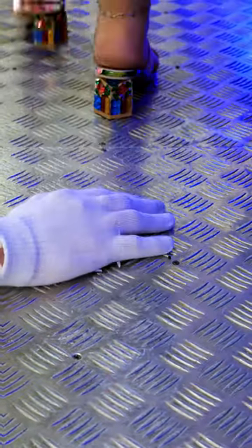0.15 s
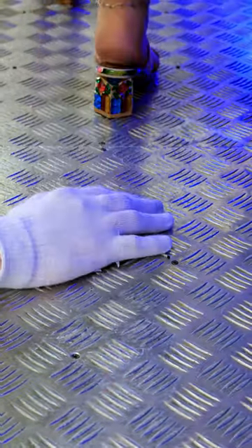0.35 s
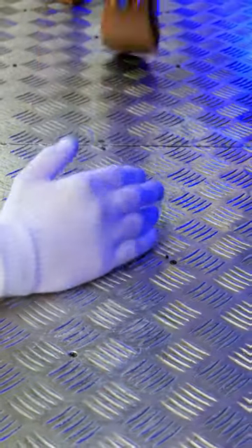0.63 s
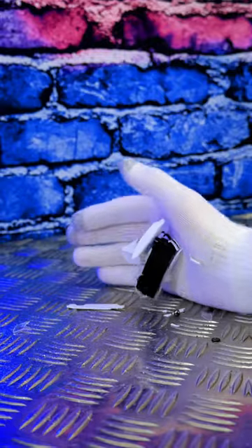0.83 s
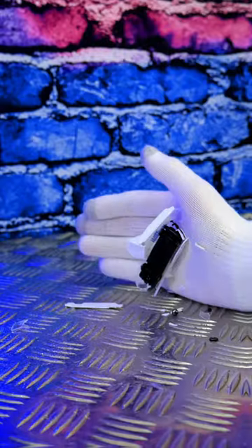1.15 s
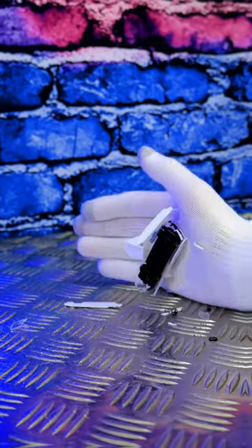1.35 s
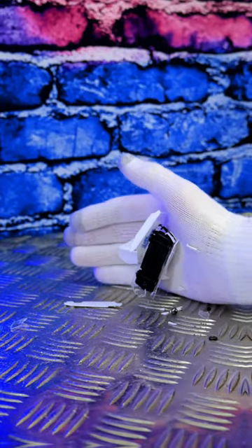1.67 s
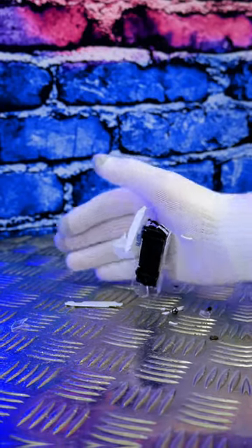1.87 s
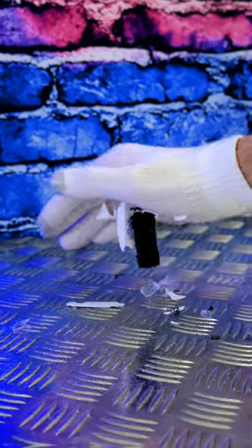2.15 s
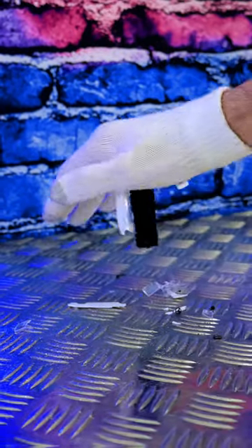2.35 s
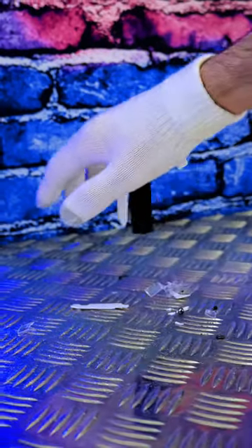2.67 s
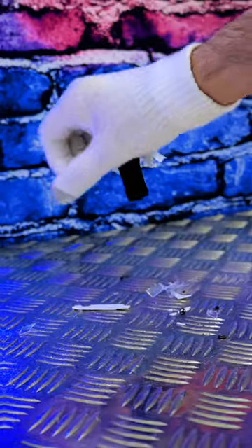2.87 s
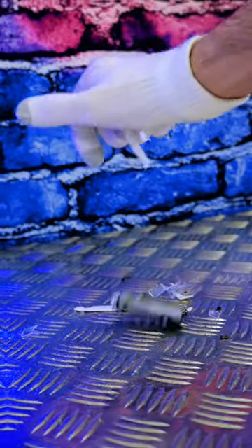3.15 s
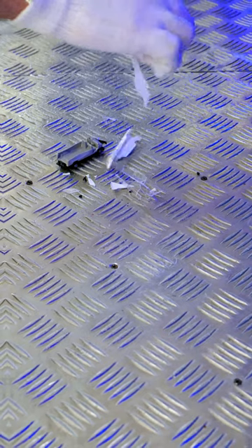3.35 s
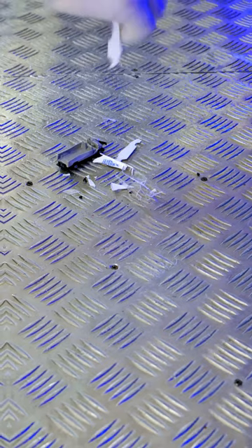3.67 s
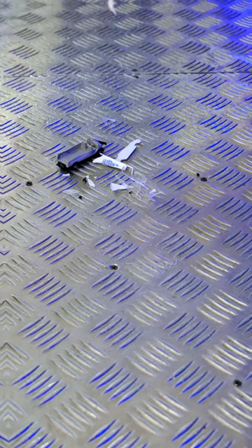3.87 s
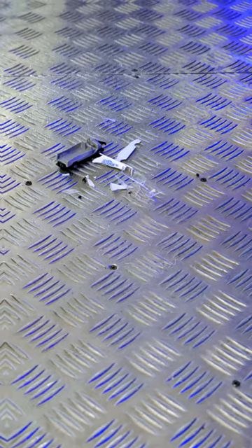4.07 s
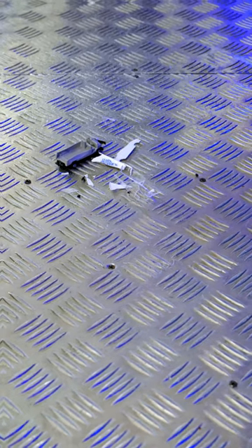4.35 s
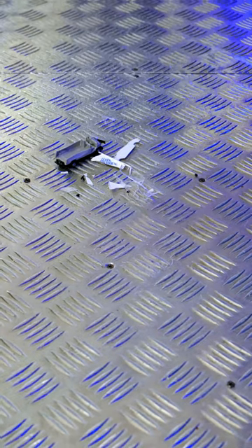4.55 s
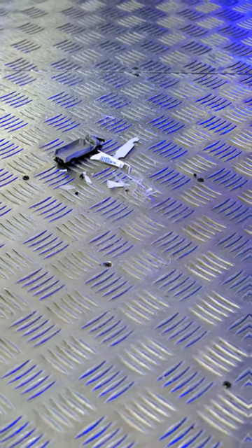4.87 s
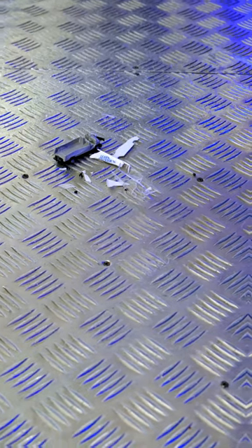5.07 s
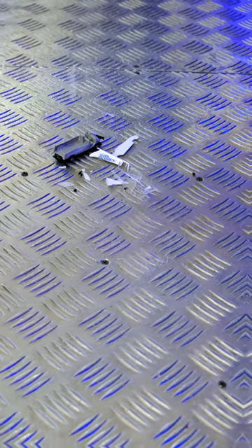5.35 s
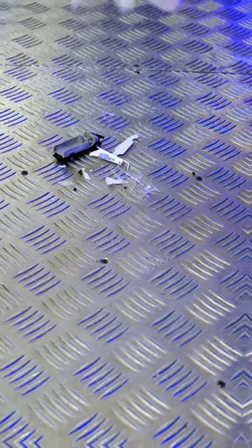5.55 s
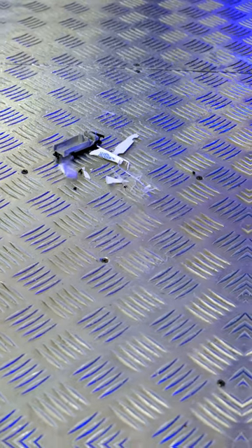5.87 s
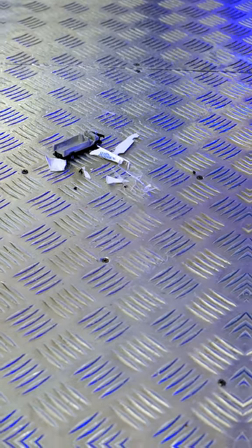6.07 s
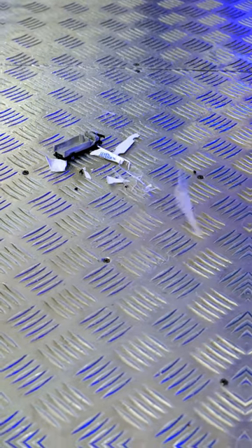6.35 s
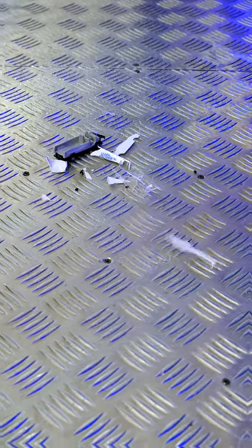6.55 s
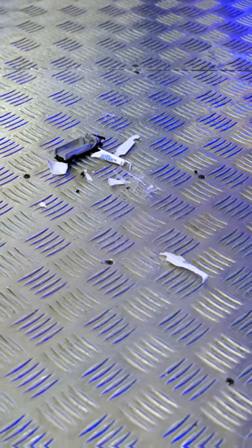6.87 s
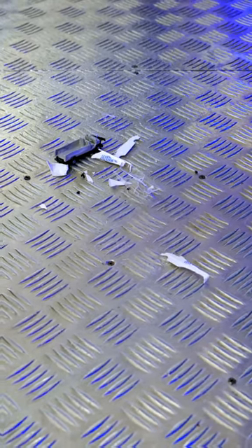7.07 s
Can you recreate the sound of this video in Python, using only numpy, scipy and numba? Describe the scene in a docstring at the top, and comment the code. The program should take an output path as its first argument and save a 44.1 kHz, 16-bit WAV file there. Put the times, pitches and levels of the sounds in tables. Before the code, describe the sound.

A gloved hand lifts broken plastic from a metal tread plate. An early cluster of dull knocks and crackling snaps gives way to small ticks and one soft heavy thump. Pieces then drop: a loud clack, crisp snaps, a bright bouncing rattle, a duller shell clatter and tiny chip clicks. Close stereo microphones, nearer on the left, with short room reflections and near-silent gaps.

```python
"""A crushed plastic toy is lifted off a metal tread plate by a gloved hand: its pieces snap, drop and bounce.
Snaps are short rattles of shaped noise; falling pieces add damped resonances, and knocks and pings decaying sines.
Glove and sleeve are two uneven noises, the plate's rumble is low noise, the arm's air pressure a slow sine.
A small hard room adds decaying noise tails to each contact, over coloured room tone that slowly swells and sinks.
Two microphones, the left one nearer to most sounds, each pass through their own noise gate."""
import sys
import numpy as np
from scipy import signal
from scipy.fft import rfft, irfft, next_fast_len
from scipy.io import wavfile
from scipy.ndimage import uniform_filter1d, map_coordinates
from numba import njit

SR = 44100
rng = np.random.default_rng(int(sys.argv[2]) if len(sys.argv) > 2 else 0)


def unload_wav(signal):
    """Save mono or channel-first audio to the path in sys.argv[1] as 16-bit WAV at rate SR, clipped to [-1, 1]."""
    wavfile.write(
        sys.argv[1],
        SR,
        np.round(np.clip(np.atleast_2d(signal).T, -1, 1) * 32767).astype(np.int16),
    )


N = 318402

# Room tone spectrum: (f/Hz, relative density/dB per Hz)
TONE_SPECTRUM = [(20, -11.5), (40, 1.5), (100, -2.5), (340, -8), (450, -8), (600, -11), (750, -18),
                 (1600, -21), (5000, -22), (9000, -27), (16500, -31)]
# Room tone level: (t/s, left level/dB, right level/dB)
TONE_LEVEL = [(0, -57, -69), (.9, -69, -60), (1.5, -71, -65.5), (3, -60, -61.5), (4.5, -63, -63),
              (6, -61.5, -62), (7.22, -59, -65)]
# Reverberation of the room: (f/Hz, time to fall 60 dB/s)
ROOM_DECAY = [(100, 0.66), (500, 0.29), (3000, 0.35), (8000, 0.34), (12500, 0.25), (16000, 0.18)]
# Air pushed at the left microphone by the arm: (t/s, level/dB)
SWAY = [(0, -34), (.08, -41), (.17, -19.5), (.9, -35.5), (1.16, -41), (1.25, -29), (1.45, -62),
        (1.68, -27.5), (1.95, -28), (2.25, -44.5), (2.7, -42.5), (3.05, -60.5), (3.3, -37.5), (3.85, -48),
        (4.12, -39.5), (4.24, -19.5), (4.52, -30), (4.62, -51.5), (5.0, -47.5), (5.45, -34), (6.0, -40),
        (6.3, -46), (6.9, -41), (7.22, -30.5)]
# Glove and sleeve moving: (t/s, rub level/dB, hiss level/dB, left over right/dB)
RUSTLE = [(0, -48.5, -45.5, 10), (.1, -61, -70.5, -1), (.37, -61, -61.5, 5.5), (.44, -22.5, -73, 24),
          (.54, -85, -62.5, 8.5), (.62, -57, -50, 24), (1.0, -71.5, -65.5, 28), (1.14, -61, -86, 6),
          (1.42, -61.5, -84, 3.5), (1.56, -57, -63.5, 15), (1.8, -53, -58, 13), (2.05, -72, -55, 14.5),
          (2.3, -59, -58, 6), (2.45, -48.5, -74, 6), (2.7, -70.5, -80.5, 16), (3.05, -71.5, -59.5, 8),
          (3.27, -44.5, -39, 6), (3.47, -42.5, -46.5, 0.5), (3.66, -64, -66, 2), (3.95, -70.5, -66.5, 5),
          (4.35, -49, -67.5, 30.5), (4.62, -68, -63, 13.5), (4.95, -75, -76, 10.5), (5.2, -72, -58, 1.5),
          (5.45, -77, -57.5, 21), (5.66, -77, -64, 6), (5.81, -38.5, -51.5, 4.5), (5.89, -52, -54, 2),
          (6.06, -64, -52, 5), (6.16, -70.5, -74.5, -1), (6.58, -67.5, -64, 5), (6.65, -57.5, -51.5, 4),
          (6.78, -42, -51.5, 14), (6.98, -48.5, -67, 34.5), (7.04, -40.5, -58, 32.5),
          (7.12, -52.5, -71, 32.5), (7.22, -56, -66.5, 25)]
# Spectrum of the cloth's rub: (f/Hz, relative density/dB per Hz)
RUB_SPECTRUM = [(47, -33), (80, -1.5), (170, 0.5), (404, -3.5), (729, -3.5), (1130, -8), (1470, -14.5),
                (4000, -24), (5200, -57.5), (8800, -120)]
# Spectrum of the cloth's hiss: (f/Hz, relative density/dB per Hz)
HISS_SPECTRUM = [(710, -31), (1200, -3.5), (1670, -9), (5220, -6.5), (8450, -14.5), (11000, -16.5),
                 (15300, -24), (16500, -51.5)]
# Dull knocks: (t/s, nominal level/dB, left over right/dB, f/Hz, damping/nepers per cycle)
KNOCKS = [(0.406, -22.5, 33.5, 366, 1.1), (0.413, -20.5, 39, 413, 2.7), (0.425, -16, 16, 336, 3.1),
          (0.443, -19, 18.5, 370, 1.3), (0.452, -22.5, 22, 404, 2.2), (0.472, -19, 17, 374, 2.4),
          (0.74, -43.5, 11, 286, 1.2), (1.42, -30.5, 38.5, 670, 2.3), (1.443, -28, 44, 635, 6.7),
          (1.508, -5.5, 20.5, 543, 1.7), (1.732, -35, 22.5, 610, 1.1), (2.37, -26, 34, 614, .68),
          (2.379, -22, 16, 540, 2.6), (2.476, -22.5, 25.5, 553, 1.05), (2.561, -37.5, 29.5, 703, 0.81),
          (3.068, -27, 15.5, 570, 1.5), (3.111, -20.5, 8.5, 258, 4.5), (3.264, -24.5, 11, 506, 1.5),
          (3.304, -26.5, 22, 475, 1.2), (3.386, -25, 24, 533, 0.57), (3.451, -24.5, 28.5, 526, 0.7),
          (3.5, -23, 9.5, 636, 1.9), (3.96, -34.5, 38.5, 517, 0.64), (4.019, -31.5, 46, 540, 1),
          (4.243, -36, 32, 520, 0.64), (4.296, -27.5, 31, 861, 0.53), (4.357, -33, 30, 422, 1.1),
          (4.673, -18, 18, 653, 1.39), (5.002, -31, 40, 740, 2.41), (5.537, -32, 20.5, 590, 1.3),
          (5.718, -7.5, 21, 680, 1.3), (7.025, -32.5, 43, 725, 1.3)]
# Thin low pings as pieces land: (t/s, nominal level/dB, left over right/dB, f/Hz, damping/nepers per cycle)
PINGS = [(5.1246, -45, 11, 1152, .018), (6.4696, -42, 5, 1421, .016)]
# Shared by all knocks: (room level/dB for a contact of -30 dB, largest swing over nominal level/dB)
KNOCK_KIND = (-2, 3.6)
# Shared by all pings: (room level/dB for a contact of -30 dB, largest swing over nominal level/dB)
PING_KIND = (-6, 0)
# Common crack spectrum before each contact's tilt: (f/Hz, level/dB)
CRACK_SPECTRUM = [(150, -21.5), (500, -9), (1200, -8), (2500, -3.5), (5000, 5.5), (9000, -1), (16000, -9)]
# Snaps and ticks of breaking plastic:
# (t/s, nominal level/dB, left over right/dB, brightness/dB per octave, room level/dB)
SNAPS = [(0.3888, -33.5, 47, -7, -4), (0.4004, -46, 29, 8, -2.5), (0.4062, -31, 31, -2.5, -4.5),
         (0.4134, -25.5, 22, -14.5, -10), (0.4246, -21.5, 27, -13, -5), (0.439, -28.5, 17.5, 7, -9.5),
         (0.4477, -31.5, 13, -11, -10.5), (0.4716, -7, 16.5, -9.5, -10), (0.5744, -40, 19, -5, -6.5),
         (0.8575, -39, 40, -3, -10), (0.8636, -33, 44, -1, -2.3), (0.8839, -39.5, 28, 4.5, -5),
         (1.048, -34, 40, 1.5, -3.5), (1.0874, -57, 23, 2.1, -6), (1.4223, -40.5, 35, -14.5, -10),
         (1.4461, -47.5, 33, -11.5, 0), (1.5084, -40.5, 18.5, -10.5, -1), (1.5801, -45.5, 24, 2, -3.5),
         (1.6101, -49, 15.5, 5, -10), (1.6681, -49, 22, -5, -3), (1.698, -42.5, 25.5, -7.5, -8),
         (1.737, -49, 28, -4, -10), (1.8029, -50.5, 27, 3, -8), (1.9186, -39, 40, -1, -12),
         (1.954, -43, 32.5, -5, -3), (2.0166, -34.5, 9, -1, -11), (2.076, -39, 25.5, -1, 1),
         (2.0845, -38, 20, 2.5, -6.5), (2.122, -35, 8, -3, -1), (2.143, -44.5, 8.5, -6, -6),
         (2.369, -25, 10, -6, 0), (2.4767, -29, 16, -9, -5.5), (2.562, -32, 31.5, -7, -5.5),
         (3.0427, -30, 7, 0.5, 0), (3.2458, -31.5, 8.5, -2.5, -2.5), (3.252, -20.5, 3.5, 2.5, -3.5),
         (3.3844, -11.5, 5.5, -1.5, -8.5), (3.415, -11.5, 8.5, 2.4, -4), (4.0214, -44, 26, -9.5, 1),
         (4.298, -45.5, 28, -3, -3.5), (4.6731, -27.5, 13.5, -18, -0.5), (4.527, -46, 36.5, 1.5, -7),
         (4.8792, -44.5, 27.5, 2, -11), (5.1241, -18.5, 6, 1.5, -0.5), (5.249, -33, 6.5, 0, 4),
         (5.305, -46.5, 8, 7.5, -4.5), (5.436, -43, 33.5, 6, 1), (5.4474, -47.5, 30.5, 2.5, -5.5),
         (6.4687, -19.5, 3.5, 0, 0.5), (6.6108, -34, 1.4, -0.5, -5.5), (6.619, -37, 0.7, -1, -3),
         (7.0293, -40.5, 48, -8.5, 1)]
# Contacts of falling pieces, in the next four tables:
# (t/s, nominal level/dB, left over right/dB, brightness/dB per octave, ring over crack/dB)
# The main body knocking the plate
BODY_HITS = [(0.5931, -35, 16.5, -3.5, 2), (0.6519, -38, 32, -4.5, 2), (0.7331, -34, 43, -2, 1.5),
             (0.775, -40.5, 24, 1, -1.5), (0.816, -43, 32, 3, -2), (0.9148, -46.5, 31, 4, 9.5),
             (0.9571, -44, 40.5, -1, -7), (0.9746, -35, 40.5, -3, 2), (2.8728, -43, 18, 1.5, 0),
             (3.0565, -40.5, 9, 0, -3.5), (3.1162, -1, 11.5, -4, -6), (3.2625, -15, 7.5, 0, -2.5),
             (3.2674, -11.5, 7.5, 2, -4), (5.4899, -6, 7.5, 2.5, 7.5), (5.4928, -8.5, 6, 10.5, 3.5),
             (5.5074, -12.5, 10, 1.5, 6.5), (5.5244, -21, 10, 3, 2.5), (5.5394, -12.5, 5.5, 6, 7)]
# A curved shell bouncing
SHELL_HITS = [(4.135, -40, 8.5, 10, -3), (4.1758, -34, 29, 1.5, 13), (4.4168, -41.5, 37, 9, 13.5),
              (4.4811, -40, 37.5, 5, -8), (5.0469, -40.5, 27, -6.5, 5), (5.0987, -37.5, 8.5, -7.5, 6.5),
              (5.8006, -14, 12.5, -3.5, 3.5), (5.8665, -23, -2.5, -1.5, 3.5), (5.9069, -18.5, 7.5, 0, 8),
              (5.9962, -32, 13, -2.5, 2), (6.0223, -35.5, 0, -1.5, 3), (6.0785, -36.5, 18.5, 1.5, 0.5)]
# Small chips bouncing
CHIP_HITS = [(2.8129, -45, 6, 4, -5.5), (2.819, -34, 9.5, 3, -10), (3.4759, -29.5, 10, 2, 1),
             (3.5448, -26, 5, 2, -9), (6.4501, -27, -4, -2.5, -8.5), (6.4774, -19.5, 5, 2, 0),
             (6.5674, -44.5, 9, 0.5, -2), (6.6716, -38.5, 3, 5.5, -0.5), (6.7031, -40, -0.5, -1.1, 6),
             (6.7594, -38, 13, -10, 0.5)]
# A clear pane sliding off
PANE_HITS = [(2.1797, -32, 5, -0.2, -1), (2.21, -30.5, 6.5, 2.4, -4.5), (2.2212, -32.5, 4, 0, -10),
             (2.2591, -34.5, 7, -0.04, -1)]
# Resonances in the next four tables: (mean f/Hz, bandwidth/Hz, mean spectral peak level/dB)
# Resonances of the main body
BODY_MODES = [(2530, 35, -17), (2935, 55, -19), (3210, 90, -20), (4625, 50, -13), (5133, 22, -2),
              (5240, 200, 0), (5303, 16, 0), (5390, 50, -4), (5625, 30, -8), (5965, 80, -13),
              (6990, 130, -6), (7645, 40, -7), (8105, 40, -10), (8365, 70, -13), (9780, 160, -14),
              (10900, 60, -16), (12050, 140, -19), (13000, 70, -19)]
# Resonances of the curved shell
SHELL_MODES = [(4350, 40, -8.5), (6130, 45, -3), (6210, 60, 0), (7640, 70, -13), (7810, 60, -4),
               (8520, 50, -8), (10420, 70, -19), (11780, 80, -20), (12790, 80, -13), (13200, 100, -19),
               (15150, 80, -14)]
# Resonances of a small chip
CHIP_MODES = [(8080, 60, -14), (9920, 35, -3), (10645, 45, 0), (11400, 90, -12), (12485, 55, -6),
              (13600, 70, -15), (14700, 60, -15), (15700, 100, -16)]
# Resonances of the clear pane
PANE_MODES = [(5660, 50, -14), (7330, 80, -4), (7430, 60, 0), (9400, 60, -14), (12200, 60, -16)]
# Shared by all contacts of a piece, in the next four: (room level/dB for a contact of -30 dB, rattle/s)
# Contacts of the main body
BODY_KIND = (-6, .012)
# Contacts of the curved shell
SHELL_KIND = (-2.5, .013)
# Contacts of the chips
CHIP_KIND = (-1.5, .011)
# Contacts of the pane
PANE_KIND = (0.73, .023)

SWAY_RIGHT_DB = -32  # the far microphone against the near one
RUMBLE_OVER_RUB_DB = -3
THUMP_DB, THUMP_DB_PER_KNOCK_DB, THUMP_T60_S = -41.5, 0.1, 1  # plate rumble after a knock
DRIER_DB_PER_DB = 0.05  # louder contacts stand out further from their room tail
SNAP_RATTLE_S = 0.012  # time to fall 60 dB
SHARD_COLOUR_DB = 2.5  # rms spread of a shard's broad peaks
BAND_LIMIT_HZ = 16600


def amp(db):
    """Decibel law: level to amplitude gain."""
    return 10 ** (np.asarray(db) / 20)


def unit(x):
    """Normalisation by mean power: each channel at rms 1."""
    return x / np.sqrt(np.mean(x ** 2, axis=-1, keepdims=True) + 1e-20)


def along(points, hz):
    """Linear interpolation of (f/Hz, value) points on a logarithmic frequency axis."""
    f, value = np.transpose(points)
    return np.interp(np.log(hz + 1), np.log(f + 1), value)


def curves(rows):
    """Linear interpolation in time: one curve for each column after t/s."""
    s, *columns = np.transpose(rows)
    t = np.arange(N) / SR
    return [np.interp(t, s, column) for column in columns]


def wobble(rate):
    """Spline interpolation of random knots, rate a second: a smooth curve for each channel."""
    knots = rng.standard_normal((2, int(N * rate / SR) + 4))
    position = np.arange(N) * rate / SR
    return np.array([map_coordinates(k, [position]) for k in knots])


def filtered(x, response):
    """Linear filtering: the spectrum is multiplied by a response of frequency."""
    size = next_fast_len(x.shape[-1] + 4096)
    hz = np.fft.rfftfreq(size, 1 / SR)
    return irfft(rfft(x, size) * response(hz), size)[..., :x.shape[-1]]


def noise(spectrum):
    """Spectral shaping of white noise: rms 1, uncorrelated between the channels."""
    white = rng.standard_normal((2, N))
    return unit(filtered(white, lambda hz: amp(along(spectrum, hz))))


def loudest(x):
    """Short-time power: rms of the loudest 2 ms."""
    return np.sqrt(uniform_filter1d(x ** 2, size=88).max())


def room_tone():
    """Amplitude modulation of coloured noise: the level slowly swells and sinks in each channel."""
    return amp(curves(TONE_LEVEL)) * noise(TONE_SPECTRUM)


def rumble():
    """Forced low-frequency vibration: the plate rumbles under rubbing and decays after each knock."""
    rub_db = curves(RUSTLE)[0]
    size = amp(rub_db + RUMBLE_OVER_RUB_DB)
    t = np.arange(N) / SR
    for s, db, *_ in KNOCKS:
        thump_db = THUMP_DB + THUMP_DB_PER_KNOCK_DB * db - 60 * abs(t - s) / THUMP_T60_S
        size = np.maximum(size, (t > s) * amp(thump_db))
    low_noise = noise([(8, -41), (20, -0.5), (60, -9.5), (120, -17.5), (300, -59.5)])
    return size * low_noise * amp([[0], [-11.5]])


def sway():
    """Slow pressure swings from the moving arm: a sine of wandering frequency, almost only on the left."""
    sway_db, = curves(SWAY)
    swing_hz = 4 * amp(3.5 * wobble(3))
    phase = 2 * np.pi * np.cumsum(swing_hz, axis=1) / SR
    return amp(sway_db + [[0], [SWAY_RIGHT_DB]]) * np.sin(phase)


def rustle():
    """Frictional noise: cloth rubs and hisses in uneven lumps, by random amplitude modulation."""
    rub_db, hiss_db, pan_db = curves(RUSTLE)
    rub = amp(rub_db) * unit(noise(RUB_SPECTRUM) * amp(1.5 * wobble(40)))
    hiss = amp(hiss_db) * unit(noise(HISS_SPECTRUM) * amp(2.5 * wobble(120)))
    return (rub + hiss) * amp([0 * pan_db, -np.clip(pan_db, 0, 60)])


def room_of(db, room_db):
    """Ratio of reverberant to direct sound, falling slightly as contacts strengthen."""
    return room_db - DRIER_DB_PER_DB * (db + 30)


def add(out, s, sound, room_db, pan_db, wet_pan):
    """Superposition of direct sound and a fresh diffuse tail; the right direct sound is panned and later."""
    hz, t, grains = signal.stft(rng.standard_normal((2, SR // 3)), SR, nperseg=256)
    decay = amp(-60 * t / along(ROOM_DECAY, hz)[:, None])
    tail = signal.istft(grains * decay, SR, nperseg=256)[1]
    tail *= np.clip(np.arange(tail.shape[1]) / (0.00045 * SR), 0, 1)  # fades in over 0.45 ms
    tail /= np.linalg.norm(tail[0])
    heard = signal.fftconvolve(sound[None], tail, axes=1) * amp([[0], [-wet_pan * pan_db]])
    heard *= amp(room_db)
    heard[0, :len(sound)] += sound
    heard[1, 40:40 + len(sound)] += amp(-pan_db) * sound  # 40 samples later, about 0.9 ms
    part = out[:, round(s * SR):][:, :heard.shape[1]]
    part += heard[:, :part.shape[1]]


def knocks():
    """Damped oscillation of a soft contact: an inward swing, with a weaker upper mode sharpening the start."""
    out, t = np.zeros((2, N)), np.arange(SR // 5) / SR
    for rows, (room_db, swing_db) in [(KNOCKS, KNOCK_KIND), (PINGS, PING_KIND)]:
        for s, db, pan_db, pitch_hz, damping in rows:
            cycles = t * pitch_hz
            lower = np.sin(2 * np.pi * cycles)
            upper = amp(-18.5) * np.sin(2 * np.pi * 2.15 * cycles)
            onset = 1 - np.exp(-(cycles / 0.6) ** 2)
            sound = -(lower + upper) * onset * np.exp(-damping * cycles)
            sound *= amp(db + swing_db) / abs(sound).max()
            add(out, s + .0015, sound, room_of(db, room_db), pan_db, wet_pan=.6)
    return out


def crack(t, tilt_db, rattle_s):
    """Broadband impulsive excitation: a short rattle of noise, with each shard's own broad spectral peaks."""
    envelope = amp(-60 * t / rattle_s) * (1 - np.exp(-t / (.03 * rattle_s)))
    spectrum = rfft(rng.standard_normal(len(t)) * envelope)
    smooth = uniform_filter1d(rng.standard_normal(len(spectrum)), size=60)
    shard_db = SHARD_COLOUR_DB * unit(uniform_filter1d(smooth, size=60))
    flattened = spectrum / uniform_filter1d(abs(spectrum), size=36)
    rattle = irfft(amp(shard_db) * flattened, len(t))
    rattle[len(t) // 2:] = 0  # drops what wraps round to before the onset

    def colour(hz):
        octaves = np.log2(np.maximum(hz, 1500) / 5000)  # the tilt is level below 1500 Hz
        return amp(along(CRACK_SPECTRUM, hz) + tilt_db * octaves)

    sound = filtered(rattle, colour)
    return sound / loudest(sound)


def ring(t, modes, rattle_s):
    """Modal superposition: resonances start at scattered moments, at new strengths, detuned by how the piece lies."""
    hz, width, db = np.transpose(modes)[..., None]
    late = np.clip(t - rng.uniform(0, .15 * rattle_s, hz.shape), 0, None)
    size = width * amp(db + rng.normal(0, 2.5, hz.shape))  # wider modes start larger for equal peaks
    hz = hz * rng.normal(1, .003, hz.shape)
    swell = np.exp(-np.pi * width * late) * (1 - np.exp(-late / 0.0011))
    sound = (size * swell * np.sin(2 * np.pi * hz * late)).sum(axis=0)
    return sound / loudest(sound)


def pieces():
    """Impact radiation: snaps are cracks alone; a falling piece also rings at its resonances."""
    out, t = np.zeros((2, N)), np.arange(SR // 6) / SR
    contacts = []
    for s, db, pan_db, tilt_db, room_db in SNAPS:
        contacts.append((s, db, pan_db, room_db, crack(t, tilt_db, SNAP_RATTLE_S)))
    for hits, modes, (room_db, rattle_s) in [(BODY_HITS, BODY_MODES, BODY_KIND),
                                             (SHELL_HITS, SHELL_MODES, SHELL_KIND),
                                             (CHIP_HITS, CHIP_MODES, CHIP_KIND),
                                             (PANE_HITS, PANE_MODES, PANE_KIND)]:
        for s, db, pan_db, tilt_db, ring_db in hits:
            sound = crack(t, tilt_db, rattle_s) + amp(ring_db) * ring(t, modes, rattle_s)
            contacts.append((s, db, pan_db, room_of(db, room_db), sound))
    for s, db, pan_db, room_db, sound in contacts:
        # the loudest 2 ms have an rms 3.5 dB under the nominal level
        add(out, s + .0006, amp(db - 3.5) * sound / loudest(sound), room_db, pan_db, wet_pan=0.88)
    return out


def scene():
    """Linear superposition of all sources at the two microphones."""
    return room_tone() + rumble() + sway() + rustle() + knocks() + pieces()


@njit
def follow(target_db, rise_db, fall_db):
    """Slew limiting: a gain climbs fast to its target and sinks slowly, in dB per sample."""
    out, gain_db = np.empty_like(target_db), target_db[0]
    for i in range(len(target_db)):
        if target_db[i] > gain_db:
            gain_db = min(target_db[i], gain_db + rise_db)
        else:
            gain_db = max(target_db[i], gain_db - fall_db)
        out[i] = gain_db
    return out


def gate(x, open_db, half_depth_db, knee_db, rise_db_s, fall_db_s):
    """Downward expansion: gain falls smoothly around the threshold, by up to twice half_depth_db."""
    heard = filtered(x, lambda hz: hz / (hz - 150j))  # the detector hears less below 150 Hz
    power = np.abs(uniform_filter1d(heard ** 2, size=220, origin=109))  # mean over 5 ms
    level_db = 10 * np.log10(power + 1e-12)
    target_db = -half_depth_db / (0.5 + np.exp((level_db - open_db) / knee_db))
    return x * amp(follow(target_db, rise_db_s / SR, fall_db_s / SR))


def record(dry):
    """Level-dependent gain in two gates, then amplitude clipping and a low-pass band limit."""
    left = gate(dry[0], open_db=-56, half_depth_db=19.5, knee_db=5.0, rise_db_s=8986.0, fall_db_s=168)
    right = gate(dry[1], open_db=-60.0, half_depth_db=23, knee_db=5.5, rise_db_s=9008.0, fall_db_s=167)
    clipped = np.clip([left, right], -.8, .8)
    return filtered(clipped, lambda hz: hz < BAND_LIMIT_HZ)


dry = scene()
out = record(dry)
unload_wav(out)
```